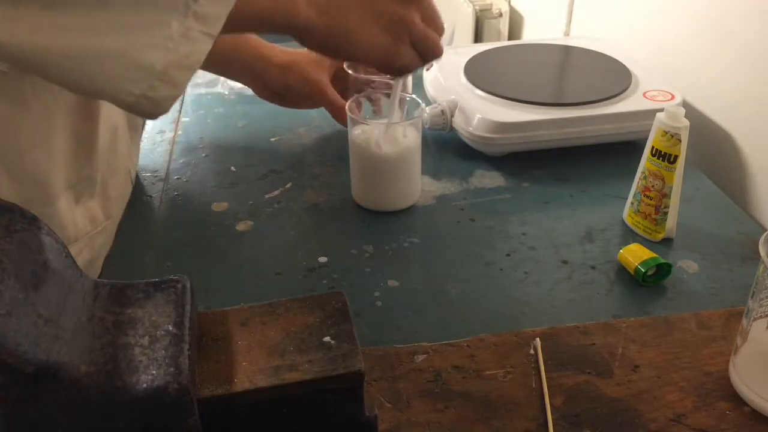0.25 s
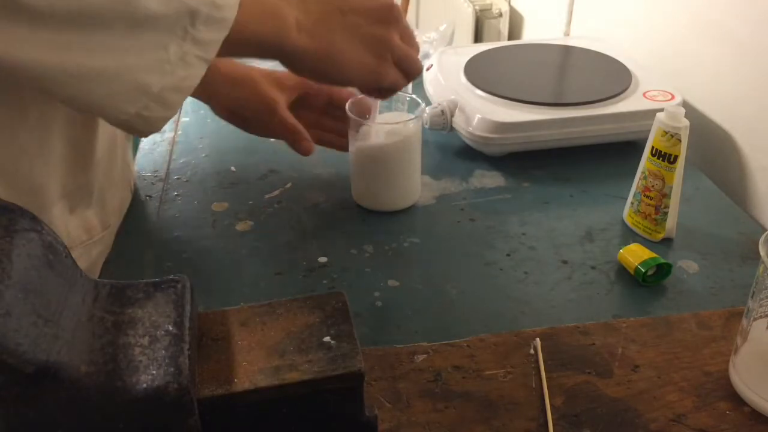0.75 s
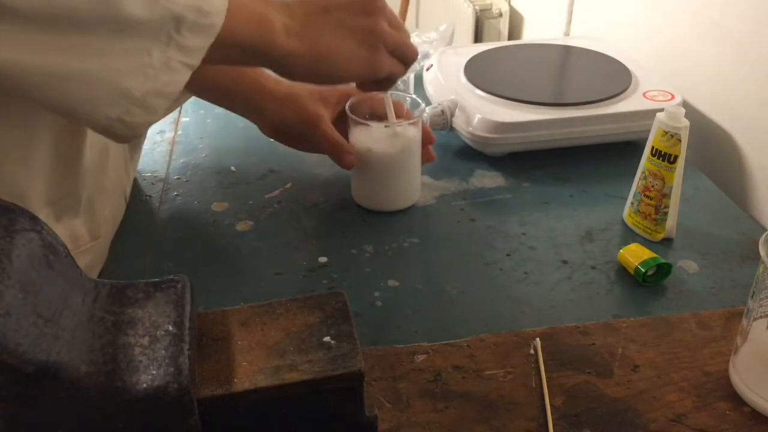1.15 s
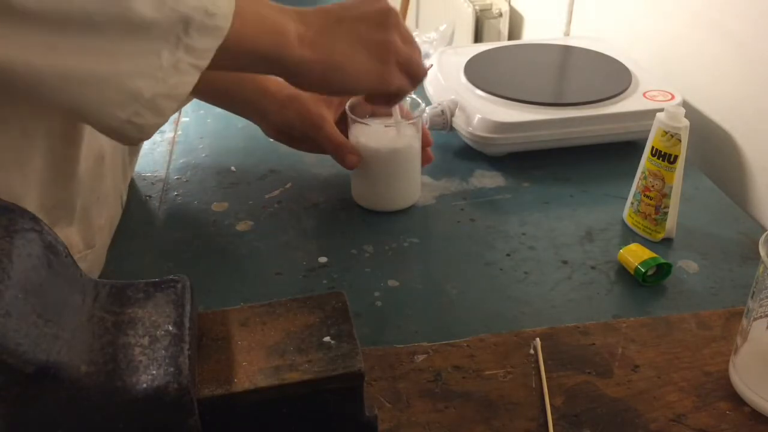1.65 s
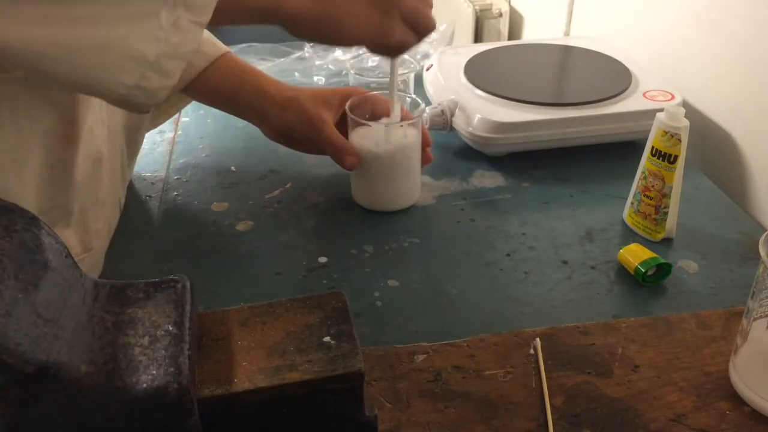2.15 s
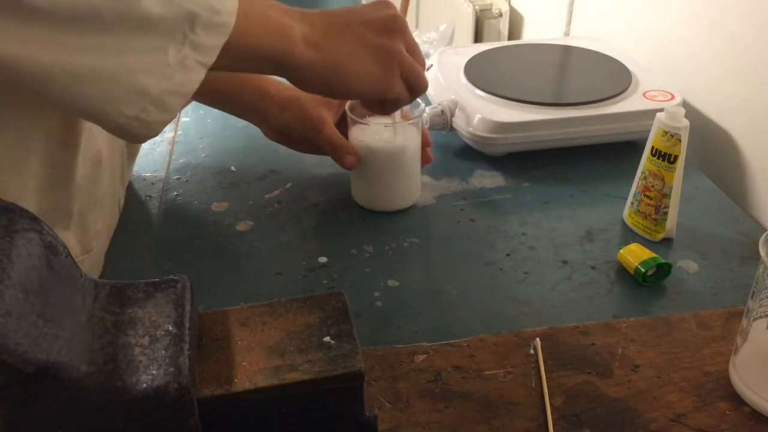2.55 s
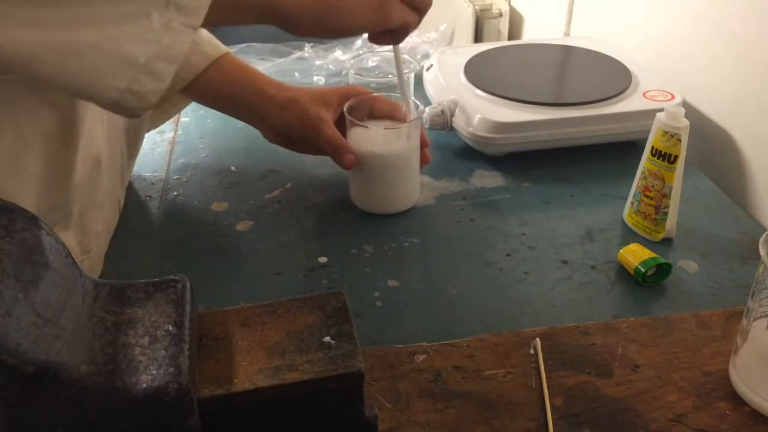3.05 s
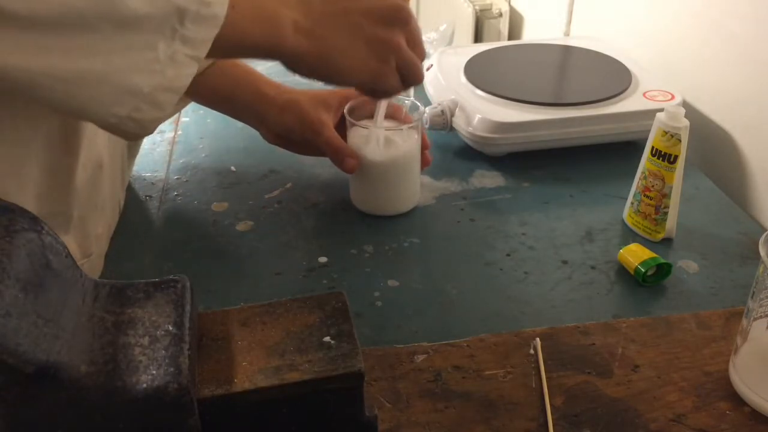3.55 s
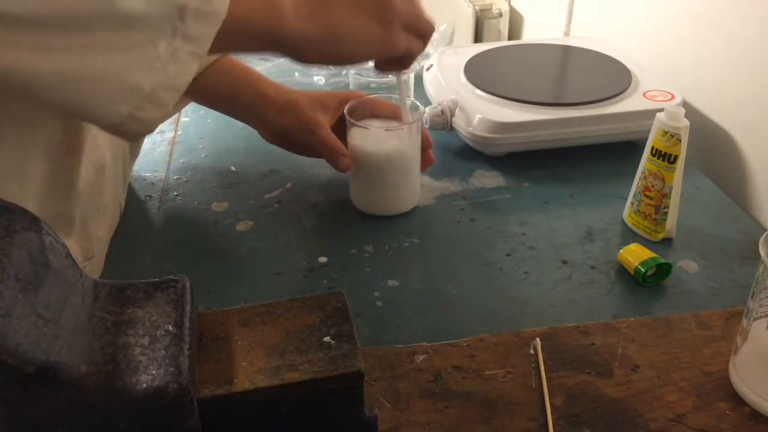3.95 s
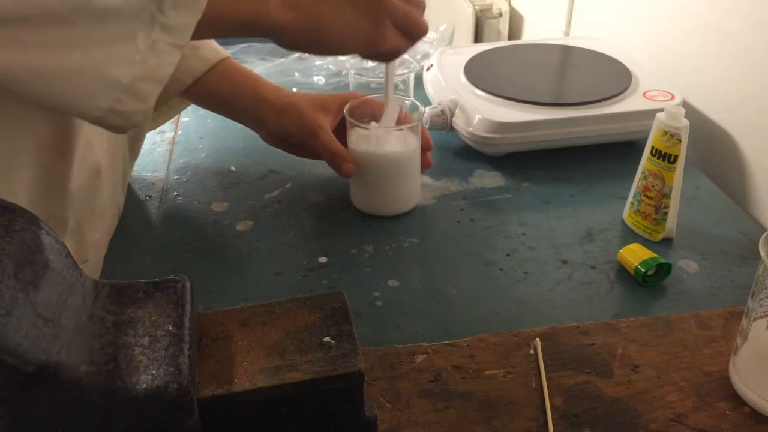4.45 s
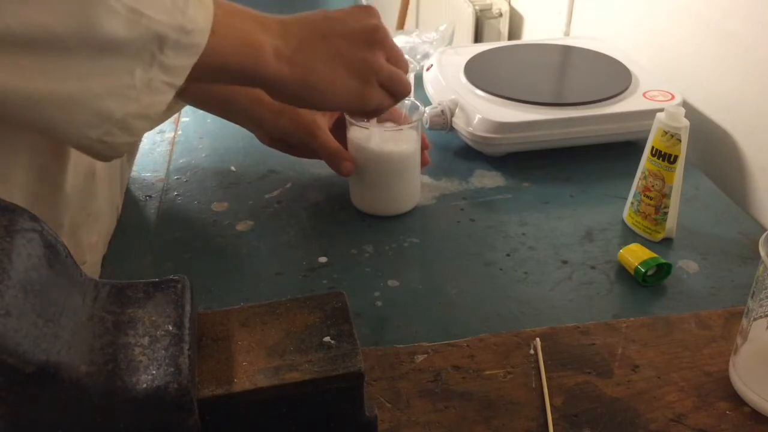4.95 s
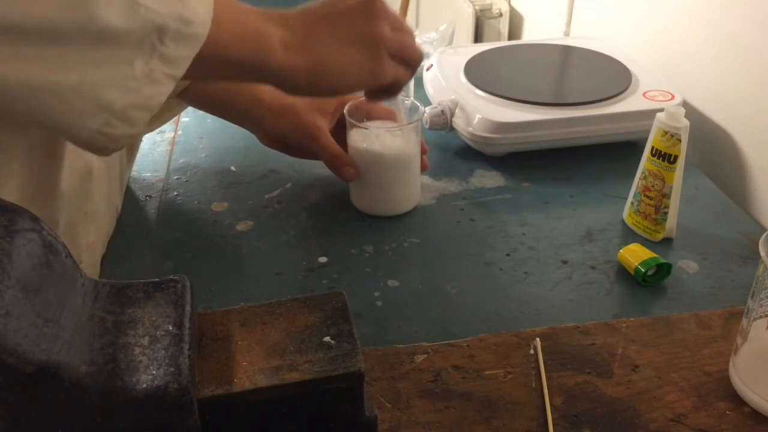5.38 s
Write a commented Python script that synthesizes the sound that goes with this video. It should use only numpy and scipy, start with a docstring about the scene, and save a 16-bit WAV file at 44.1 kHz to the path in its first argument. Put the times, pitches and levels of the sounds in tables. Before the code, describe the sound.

Heard from just above a workbench in a small room, a glass beaker lands a hollow knock, then clinks once against a spoon and rocks. The spoon goes on stirring thick paste, tapping the glass softly and irregularly while air pockets snap with little wet smacks. A low rumble comes and goes early on, and the taps continue to the end over a faint grainy rub, hiss and hum.

```python
"""A spoon works a thick white paste up and down in a glass beaker on a workbench, in a small quiet room.
At first the glass still rings faintly, with a fading, hissy shimmer; the beaker bumps the bench, then
clinks freely once and rocks. From there a hand steadies it and the taps turn short and dull, while the
paste smacks as the spoon pulls through it. A soft rumble passes at about two seconds, and the taps and
smacks carry on to the end over a faint rub of stirring, hiss and hum."""
import sys
import numpy as np
from scipy import signal
from scipy.fft import rfft, irfft, next_fast_len
from scipy.io import wavfile
from scipy.ndimage import map_coordinates

SR = 44100
rng = np.random.default_rng(int(sys.argv[2]) if len(sys.argv) > 2 else 0)


def log_audio(samples):
    """Write samples as a 16-bit WAV file to the path given in sys.argv[1]."""
    # one column per channel
    frames = np.atleast_2d(samples).T
    # limit to full scale, then quantise
    limited = np.clip(frames, -1, 1)
    pcm = np.round(limited * 32767).astype(np.int16)
    wavfile.write(sys.argv[1], SR, pcm)


N = 247842
T = np.arange(SR * 3 // 4) / SR  # seconds within one blow

# modes of the bench under the beaker: pitch_hz, relative_db, t60_s
BENCH_MODES = [(248, -15, 0.078), (294.8, 7.5, 0.06), (331, -3.5, 0.078)]


def taps():
    """Spoon taps ring the wall's low modes at the rim, its high ones below, bottom and bench deep down."""
    # spoon on glass: start_s, strength_db, depth (0 rim, 1 bottom), spoon_db (re strength), wall_hz
    hits = [(0.067, -79, 1, -1, 4250), (0.8881, -57.5, 1, 6, 3460), (0.929, -63.5, 1, 6.5, 4430),
            (1.7655, -64.5, .98, -10, 4640), (1.771, -66, .66, -13, 4450), (1.9125, -44.5, 0.65, -21, 3660),
            (1.920, -62, .92, -0.5, 4040), (2.369, -66, 0.59, 2, 4240), (2.592, -56.5, .96, -11.5, 2915),
            (2.6107, -68.5, .67, -0.5, 2780), (3.050, -69.5, .72, 1.5, 4450), (3.0746, -65, 0.59, -6, 4380),
            (3.386, -56.5, .17, -8, 4534), (3.525, -63.5, .33, -12, 4470), (3.924, -51, 0.25, 6, 4642),
            (4.195, -64, .1, -9, 4610), (4.326, -75, .33, -5, 4540), (4.661, -78.5, .6, 19, 4650),
            (4.7015, -75, .68, 6, 4585), (5.3852, -72.5, .68, -17, 4500), (5.547, -49.5, 0.061, -13, 4444)]
    # modes of the spoon, the beaker's bottom and its wall: pitch_hz, relative_db, t60_s
    spoon_modes = [(926, 1, .11), (1152, -4, .05), (1545, 0, .05), (1800, -4, .035), (2400, -1, .03),
                   (3800, -3, .03)]
    bottom_modes = [(515, 6, 0.059), (553, -0.5, 0.076), (591, -7.5, 0.15)]
    low_wall_modes = [(2125, 0, .11), (2195, -5, .08), (8850, -12, .08)]
    # high wall modes, which shift as the grip moves: multiple of wall_hz, relative_db, t60_s
    high_wall_ratios = [(.88, -8, .025), (1, 0, .04), (1.035, -4, .035), (1.545, -12, .06),
                        (1.93, -20, .06)]
    # colours of the contact click, its bright edge and the spoon's clack: frequency_hz, relative_db
    click_colour = [(150, -21.5), (500, -4.5), (1200, -6.5), (2500, 0.5), (3800, 3.5), (5500, 0),
                    (7500, -5), (10000, -19.5), (16000, -25)]
    edge_colour = [(2000, -25), (5000, -7), (7000, -5), (9000, -4.5), (12000, -8), (15500, -7.5)]
    clack_colour = [(300, -21.5), (900, -0.5), (1600, 5.5), (2450, 2), (3000, -16.5), (4000, -6),
                    (4900, -6), (5600, -27), (15000, -30)]
    # each part's answer to a medium tap, by where it lands:
    # rim_db, upper_wall_db, lower_wall_db, bottom_db, growth (dB per dB of strength)
    edge_law = (-59, -66, -63.5, -64, 0.6759)
    low_wall_law = (-60.5, -70.5, -81, -75, 1.06)
    high_wall_law = (-67, -54.5, -68, -68, 1.07)
    bench_law = (-63.5, -71, -68.5, -60, 0.62)
    bottom_law = (-77, -76.5, -75.5, -55, 0.77)
    out = np.zeros(N)
    for start_s, db, depth, spoon_db, wall_hz in hits:
        click = amp(db) * crack(click_colour, t60=.028, attack=0.0013)
        edge = tap_gain(edge_law, db, depth) * crack(edge_colour, t60=.022, attack=0.00019)
        high_wall_modes = [(wall_hz * multiple, level, t60) for multiple, level, t60 in high_wall_ratios]
        low_wall = tap_gain(low_wall_law, db, depth) * ring(low_wall_modes, attack=0.0008)
        high_wall = tap_gain(high_wall_law, db, depth) * ring(high_wall_modes, attack=0.0011)
        spoon_ring = ring(spoon_modes, attack=0.00045)
        clack = amp(-1) * crack(clack_colour, t60=0.078, attack=0.00046)
        spoon = amp(db + spoon_db) * blow(spoon_ring + clack)
        bench = tap_gain(bench_law, db, depth) * ring(BENCH_MODES, attack=0.0044)
        bottom = tap_gain(bottom_law, db, depth) * ring(bottom_modes, attack=0.0019)
        tap = click + edge + low_wall + high_wall + spoon + bench + bottom
        add(out, start_s, in_room(tap, wet_db=-8.5, early_db=-10))
    return out


def tap_gain(law, strength_db, depth, medium_db=-62):
    """How strongly one part answers a tap of this strength and depth."""
    *by_depth, growth = law
    depth_db = np.interp(depth, np.linspace(0, 1, len(by_depth)), by_depth)
    return amp(depth_db + growth * (strength_db - medium_db))


def clink():
    """The spoon strikes the glass while no hand damps it, and the beaker rocks back onto the bench."""
    # modes of the free beaker: pitch_hz, relative_db, t60_s
    glass_modes = [(1653, -26, .05), (2517, -16, .11), (2923, -19, .14), (3187, -14, .05), (3650, -11, .02),
                   (4100, -11, .02), (4580, -10, .07), (4780, -16, .06), (6460, -7, .03),
                   (6553, -1.5, .045), (6830, -10, .025), (7780, -16, .02), (9100, -12, .012),
                   (11500, -12, .009)]
    # colour of the strike: frequency_hz, relative_db
    strike_colour = [(200, -41), (800, -9.5), (1800, -4), (2700, 8), (5000, 6.5), (7500, 2), (10000, -4.5),
                     (11700, 1), (12300, -25.5), (16000, -20.5)]
    start_s, rock_delay_s = 0.6548, 0.045
    out = np.zeros(N)
    glass = amp(-35) * ring(glass_modes, attack=0.00027)
    strike = amp(-36) * crack(strike_colour, t60=0.016, attack=0.00068)
    add(out, start_s, in_room(glass + strike, wet_db=-8.5, early_db=-6))
    add(out, start_s + rock_delay_s, amp(-59.5) * ring(BENCH_MODES, attack=0.0095))
    return out


def bump():
    """The beaker's base knocks on the bench top; the deepest part of the knock stays faint."""
    # body of the knock: pitch_hz, relative_db, t60_s
    knock_modes = [(118, -36, .14), (298, -18, .09), (350, -28, .2), (400, -25, .08), (590, -19, .07),
                   (665, -18, .06), (749, -23, .17), (780, 0, .021), (815, -25, .13), (880, -18, .07),
                   (1040, -33, .06), (1200, -23, .04)]
    # colour of the contact: frequency_hz, relative_db
    contact_colour = [(60, -11), (200, 3), (1300, 12), (1800, -1.5), (3300, 0), (4800, -5.5), (5600, -22),
                      (7500, -11), (8500, -15.5), (10000, -28), (16000, -32)]
    start_s = 0.221
    out = np.zeros(N)
    low_cut = signal.butter(1, 170, "highpass", fs=SR, output="sos")
    body = signal.sosfilt(low_cut, amp(-23.3) * ring(knock_modes, attack=.002))
    contact = amp(-43.5) * crack(contact_colour, t60=.04, attack=0.0009)
    add(out, start_s, in_room(body + contact, wet_db=-9.5, early_db=-8.5))
    return out


def smacks():
    """Pockets of air snap open in the paste; the smaller the pocket, the higher its pitch."""
    # sticky smacks: start_s, level_db, centre_hz, width_octaves
    pockets = [(0.344, -71, 5000, .9), (0.902, -46.5, 4690, 0.48), (0.907, -50.5, 4760, .87),
               (1.540, -49.5, 6670, 0.468), (2.370, -46, 5900, .43), (3.4716, -55, 3810, 0.21),
               (4.970, -62.5, 5980, .2), (5.59, -64, 4660, 0.043)]
    out = np.zeros(N)
    for start_s, db, hz, octaves in pockets:
        smack = amp(db) * burst(hz, octaves, t60=.034)
        add(out, start_s, in_room(smack, wet_db=-9.5, early_db=-18))
    return out


def shimmer_and_squeak():
    """At first the glass still rings faintly, with a hissy shimmer; later the spoon squeaks and swishes."""
    # the beaker's faint opening ring: pitch_hz, relative_db, t60_s
    fading_modes = [(490, 0, .19), (969, -11, .5), (3106, -8, .35), (4242, -7, .4)]
    # glass shimmer, spoon squeak, spoon swish: start_s, level_db, centre_hz, width_octaves, t60_s
    bursts = [(0.003, -64, 3640, .52, 0.39), (0.42, -70.5, 3850, .02, .19), (3.22, -69, 5030, 0.95, 0.26)]
    out = np.zeros(N)
    add(out, 0, amp(-60.5) * ring(fading_modes, attack=0.00196))
    for start_s, db, hz, octaves, t60 in bursts:
        add(out, start_s, in_room(amp(db) * burst(hz, octaves, t60), wet_db=-9.5, early_db=-16))
    return out


def stirring():
    """A faint, grainy rub of the spoon through the paste swells with each stroke."""
    strokes_per_s = 2.6
    stroke_db = 1.5 * np.cos(2 * np.pi * strokes_per_s * np.arange(N) / SR)
    rub = noise([(200, -12), (450, -0.5), (1200, 7), (4500, -5), (8000, -7), (15000, -16)], N)
    drift_db, grain_db = 1.7 * wobble(4.7), 2.5 * wobble(300)
    return amp(-79) * unit(rub * amp(stroke_db + drift_db + grain_db))


def rumble():
    """A soft, deep rumble comes and goes."""
    # its rise and fall: time_s, level_db
    swell = [(1.9, -86), (2.03, -67.5), (2.3, -73), (2.501, -94)]
    level_db = np.interp(np.arange(N) / SR, *np.transpose(swell))
    bass = noise([(20, -24.5), (45, 4), (65, -1.5), (120, -15), (300, -37.5), (2000, -92)], N)
    return amp(level_db) * bass


def room_tone():
    """Steady hiss and rumble with a little wavering electrical hum."""
    # hum tones: pitch_hz, level_db
    hum_tones = [(53, -84), (99.5, -79)]
    # colour of the room's air: frequency_hz, relative_db
    air_colour = [(22, -34), (38, -2), (124, -6.5), (201, -1.5), (265, -9), (309, -8.5), (985, -13.5),
                  (1060, -17.5), (1630, -20), (1800, -19), (2630, -22), (13900, -28), (15800, -28.5)]
    t = np.arange(N) / SR
    hum = np.zeros(N)
    for hz, db in hum_tones:
        peak = np.sqrt(2) * amp(db + 2.5 * wobble(5))
        hum += peak * np.sin(2 * np.pi * hz * t + .7 * wobble(4))
    return amp(-69) * noise(air_colour, N) + hum


def in_room(x, wet_db, early_db):
    """A blow followed by scatter from things on the bench and by the room's tail."""
    # reverb time of the small room: frequency_hz, t60_s
    room_decay = [(100, 0.38), (400, 0.85), (800, 0.57), (2500, 0.65), (6000, .36), (10000, 0.36),
                  (15000, 0.37)]
    hz, t, spectrum = signal.stft(rng.standard_normal(len(T)), SR, nperseg=256)
    decay = amp(-60 * t / along(room_decay, hz)[:, None])
    tail = signal.istft(spectrum * decay, SR, nperseg=256)[1][:len(T)]
    tail *= 1 - np.exp(-T / 0.0073)
    early = rng.standard_normal(len(T)) * fade(t60=.11, attack=0.0059)
    response = amp(wet_db) * tail / np.linalg.norm(tail) + amp(early_db) * early / np.linalg.norm(early)
    return x + signal.fftconvolve(x, response)[:len(T)]


def ring(modes, attack):
    """Damped modes; each blow lands elsewhere and shares them out a little differently."""
    return blow(sum(amp(db + rng.standard_normal()) * fade(t60, attack) * np.sin(2 * np.pi * hz * T)
                    for hz, db, t60 in modes))


def crack(colour, t60, attack):
    """The dense, short-lived vibration right at a contact."""
    return blow(noise(colour, len(T)) * fade(t60, attack))


def burst(hz, octaves, t60):
    """Dying noise around one pitch; a wide burst also spills weakly into the range below."""
    def band(f):
        peak = np.exp(-.5 * (np.log2((f + 1) / hz) / octaves) ** 2)
        spill = octaves * amp(-10) / (1 + (f / hz) ** 2)
        return peak + spill
    return blow(filtered(rng.standard_normal(len(T)), band) * fade(t60, attack=0.0008))


def noise(colour, size):
    """Noise of rms 1, shaped by (frequency_hz, relative_db) points."""
    return unit(filtered(rng.standard_normal(size), lambda hz: amp(along(colour, hz))))


def wobble(rate):
    """A smooth random curve, rate knots a second."""
    return map_coordinates(rng.standard_normal(int(N * rate / SR) + 4), [np.arange(N) * rate / SR])


def fade(t60, attack):
    """Quick rise and exponential decay, both times in seconds."""
    return amp(-60 * T / t60) * (1 - np.exp(-T / attack))


def filtered(x, gain):
    """x through a gain that depends on frequency."""
    size = next_fast_len(len(x) + 8192)
    return irfft(rfft(x, size) * gain(np.fft.rfftfreq(size, 1 / SR)), size)[:len(x)]


def along(points, hz):
    """Read (frequency_hz, value) points on a log axis."""
    knots_hz, values = np.transpose(points)
    return np.interp(np.log(hz + 1), np.log(knots_hz), values)


def amp(db):
    """Decibels to gain."""
    return 10 ** (np.asarray(db) / 20)


def unit(x):
    """Scale to rms 1."""
    return x / np.sqrt(np.mean(x ** 2) + 1e-20)


def blow(x):
    """Scale a transient to the energy of 20 ms at rms 1."""
    return x / np.sqrt(np.sum(x ** 2) / (SR / 50) + 1e-20)


def add(track, start_s, x):
    """Mix x into the track at start_s."""
    part = track[max(round(start_s * SR), 0):][:len(x)]
    part += x[:len(part)]


def scene():
    """Everything in mono, as heard from just above the bench."""
    beaker = bump() + clink() + taps() + smacks() + shimmer_and_squeak() + stirring()
    return (beaker + rumble() + room_tone())[None]


def record(dry):
    """A sharp high cut takes off the very top of the treble."""
    top_hz = 15500
    return np.array([filtered(channel, lambda hz: hz < top_hz) for channel in dry])


dry = scene()
out = record(dry)
log_audio(out)
```